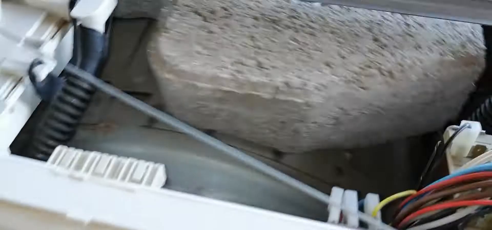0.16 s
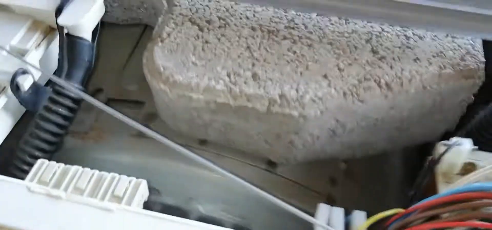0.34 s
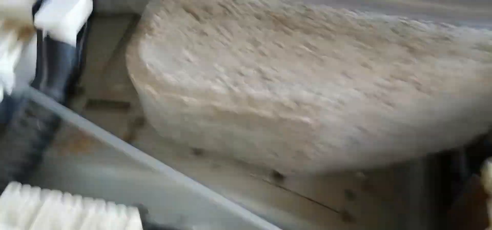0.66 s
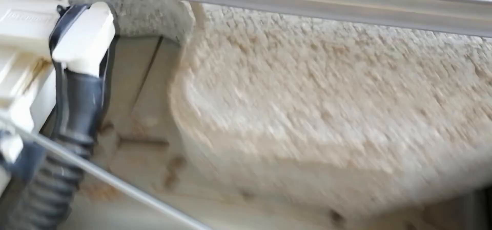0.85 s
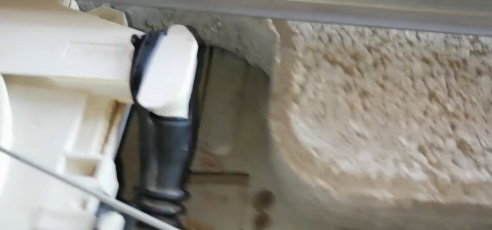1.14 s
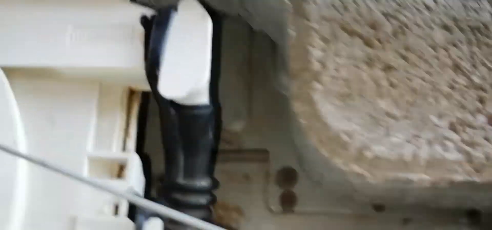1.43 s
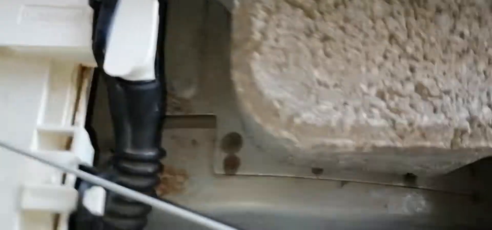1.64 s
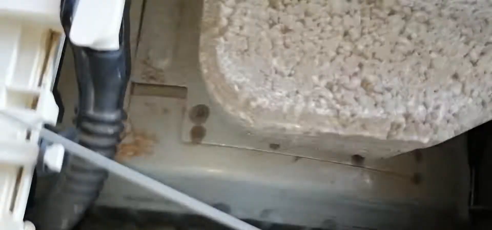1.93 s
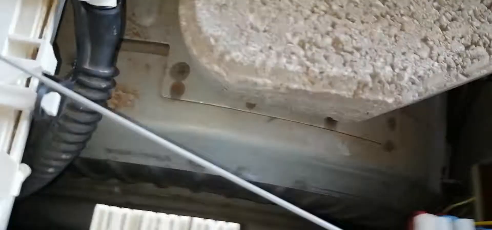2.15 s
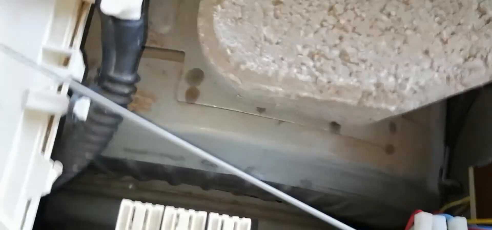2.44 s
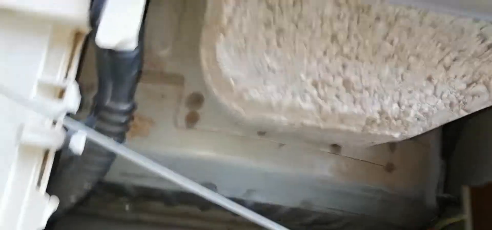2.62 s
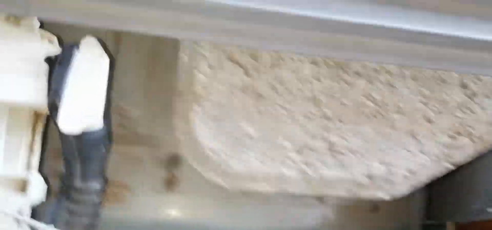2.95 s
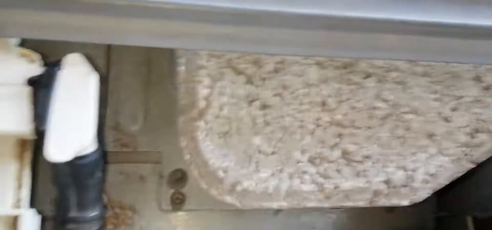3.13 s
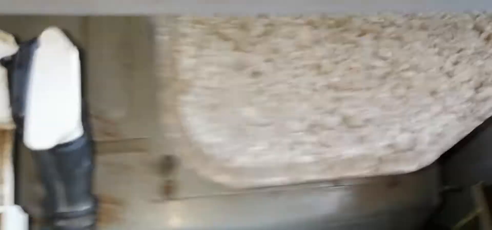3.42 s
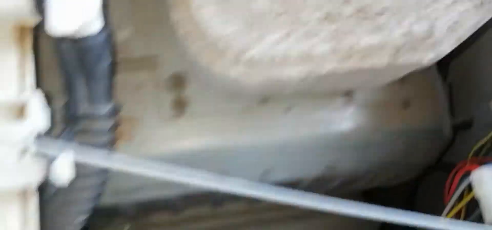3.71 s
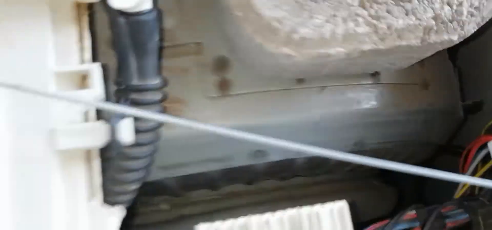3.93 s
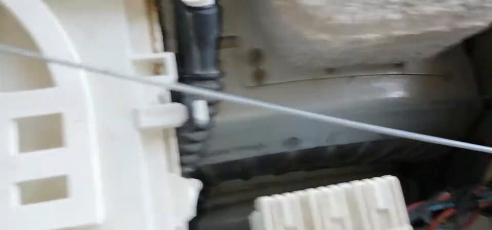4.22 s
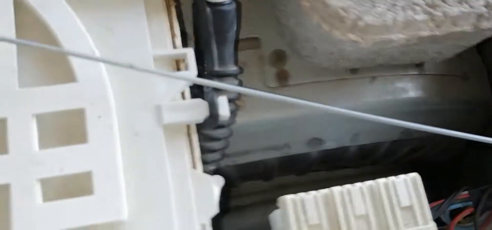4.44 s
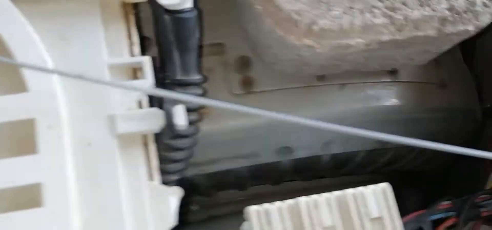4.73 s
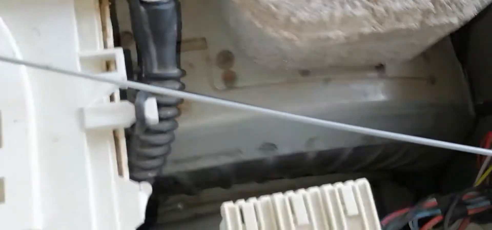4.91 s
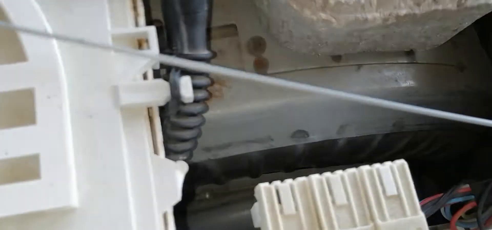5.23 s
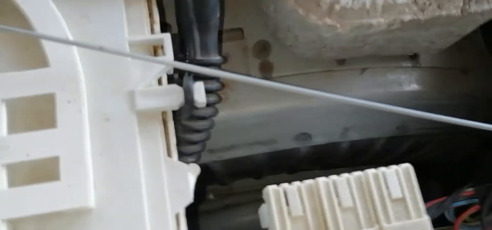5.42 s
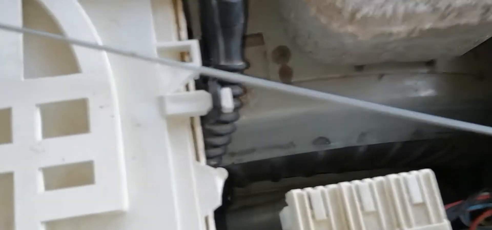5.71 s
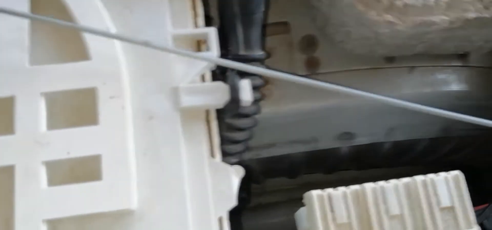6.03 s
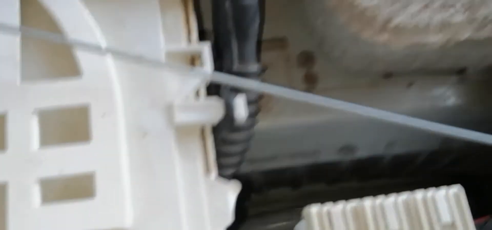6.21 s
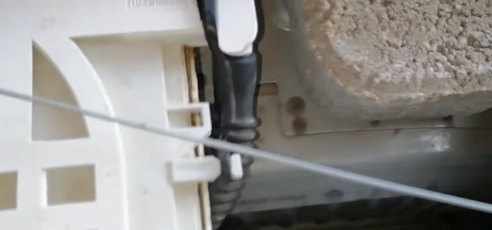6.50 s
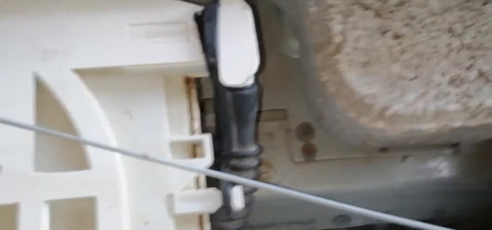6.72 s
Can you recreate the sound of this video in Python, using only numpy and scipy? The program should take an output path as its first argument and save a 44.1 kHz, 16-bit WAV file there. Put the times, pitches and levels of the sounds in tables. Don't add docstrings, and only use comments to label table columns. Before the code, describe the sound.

An unbalanced washing machine drum knocks fast and metallically inside its cabinet, slows to rumble and taps, rubs harshly on plastic, then knocks again.

```python
import sys
import numpy as np
from scipy import signal
from scipy.fft import rfft, irfft, next_fast_len
from scipy.io import wavfile
from scipy.ndimage import uniform_filter1d, map_coordinates

SR = 44100
rng = np.random.default_rng(int(sys.argv[2]) if len(sys.argv) > 2 else 0)


def magnitude_from_level(level_db):
    exponent = np.asarray(level_db, float) / 20
    return 10 ** exponent


def wav_out(sig):
    wavfile.write(sys.argv[1], SR, np.round(np.clip(np.atleast_2d(sig).T, -1, 1) * 32767).astype(np.int16))


N = 302526
TIME = np.arange(N) / SR
KNOCK = 8192
KNOCK_TIME = np.arange(KNOCK) / SR


def unit(x):
    return x / np.sqrt(np.mean(x ** 2) + 1e-20)


def along(points, hz):
    f, v = np.transpose(points)
    return np.interp(np.log(hz + 1), np.log(f + 1), v)


def filtered(x, response):
    m = next_fast_len(len(x) + 8192)
    return irfft(rfft(x, m) * response(np.fft.rfftfreq(m, 1 / SR)), m)[:len(x)]


def body(modes):
    def response(f):
        total = 0
        for k, (centre, width, db) in enumerate(modes):
            damping = 1j * f * width
            total = total + (-1) ** k * magnitude_from_level(db) * damping / (centre ** 2 - f ** 2 + damping)
        return total
    return response


def wobble(rate):
    return map_coordinates(rng.standard_normal(int(N * rate / SR) + 4), [np.arange(N) * rate / SR])


# f/Hz, time to fall 60 dB/s
CABINET = [(300, 0.26), (1000, 0.17), (3000, 0.091), (7000, 0.012)]


def tail():
    hz, t, z = signal.stft(rng.standard_normal(KNOCK), SR, nperseg=256)
    fading = magnitude_from_level(-60 * t / along(CABINET, hz)[:, None])
    answer = signal.istft(z * fading, SR, nperseg=256)[1][:KNOCK]
    return answer / np.linalg.norm(answer)


# t/s, stand 0-4
PATH = [
    (.9, 0),
    (1.45, 1),
    (2.1, 2),
    (2.5, 3),
    (5.85, 3),
    (6.05, 4),
]


def heard(stands, s):
    stand = np.interp(s, *np.transpose(PATH))
    return [np.interp(stand, np.arange(len(stands)), band) for band in np.transpose(stands)]


# f/Hz, width/Hz, level/dB
PART_EARLY = [(503, 23, -6), (646, 12, -1), (827, 19, -1.5), (957, 8.8, 3.5), (1101, 20.6, 5),
              (1233, 20, -9), (1440, 20, -12.5), (1600, 18, -5.5), (1955, 70, -4), (2520, 75, -6),
              (3013, 28, -2.5), (3140, 240, -12), (3494, 83, -10), (5010, 76, -21), (6000, 71, -17.5)]
PART_MIDDLE = [(672, 77, 0), (964, 36, -3), (1105, 25, -3.5), (1237, 16, -9), (1675, 77, -6), (2150, 40, 1),
               (2220, 70, -0.5), (2980, 200, -2), (3344, 150, -5.5), (3634, 40, -4.5), (4260, 250, -11),
               (4860, 310, -10.5), (5280, 17, -47), (6800, 110, -23)]
PART_FAR = [(637.6, 3.9, 8), (1109, 81, 0.5), (1487, 110, -8), (1772, 88, -10), (2140, 19, -10.5),
            (2354, 460, -4.5), (2350, 48, 6.5), (2850, 26, 3), (3610, 220, -0.5), (4010, 220, -2),
            (4510, 77, 2.5), (4800, 340, -5.5), (5170, 67, -37.5), (7000, 450, -14)]
PART_LATE = [(512, 120, -4), (665, 60, 0.5), (972, 53, 2), (1118, 43, -2.5), (1270, 117, -9.5),
             (1694, 33, -5.5), (1923, 25, -9.5), (2174, 14, -1.5), (2530, 15, -7.5), (3090, 100, -14),
             (3710, 76, -12), (4380, 90, -12.5), (4900, 350, -16), (6020, 150, -35), (6930, 240, -21)]
PLACES = [.8, 1.45, 2.1, 5.9]


def place(s, hz):
    step = np.interp(s, PLACES, np.arange(4))
    k = min(int(step), 2)
    parts = [PART_EARLY, PART_MIDDLE, PART_FAR, PART_LATE]
    near, then = [np.multiply(part, [1, 1.4, 1]) for part in parts[k:k + 2]]
    turn = np.pi / 2 * (step - k)
    return np.cos(turn) * body(near)(hz) + np.sin(turn) * body(then)(hz)


def rib(hz, rib_hz, db):
    return 1 + body([(rib_hz, 0.053 * rib_hz, db)])(hz)


def struck(ribs):
    def part(s, hz):
        low_hz, low_db, high_hz, high_db = heard(ribs, s)
        return place(s, hz) * rib(hz, low_hz, low_db) * rib(hz, high_hz, high_db)
    return part


# f/Hz, width/Hz, level/dB
BOOM = [(204.4, 13, -2.5), (234.7, 13, 5.5), (274.7, 11, 0.5), (329, 11, -12)]
# f/Hz, width/Hz, level/dB
THUD = [(266.4, 53, 0.009)]
THUD_RINGS_DB = -15.5
# f/Hz, level/dB
RATTLE = [(250, -18.5), (450, -11), (800, -10.5), (1500, -15.5), (3000, -17), (4000, -24), (5000, -21.5),
          (7500, -31)]


def knocks(rows, part, blow, rise, t60, fresh, fill_db, wet_db, gain_db, high_db, hold):
    out, t = np.zeros(N + KNOCK), KNOCK_TIME
    hz = np.fft.rfftfreq(2 * KNOCK, 1 / SR)
    push = np.exp(-t / 0.0012) * (1 - t / 0.00074)
    panel = body(THUD)(hz) + magnitude_from_level(THUD_RINGS_DB) * body(BOOM)(hz)
    thud = -irfft(rfft(push, 2 * KNOCK) * panel)[:KNOCK]
    echo = 1 + magnitude_from_level(wet_db) * rfft(tail(), 2 * KNOCK)
    contacts = rng.standard_normal(KNOCK)
    for s, db, mids_db, upper_db, treble_db, thud_db in rows:
        new = rng.standard_normal(KNOCK) * magnitude_from_level(1.5 * rng.standard_normal(KNOCK))
        contacts = np.sqrt(1 - fresh ** 2) * contacts + fresh * unit(new)
        lasts = t60 * magnitude_from_level(1.5 * rng.standard_normal())
        fading = magnitude_from_level(-60 * (t / lasts) ** hold) + magnitude_from_level(-24.5 - 60 * t / 0.36)
        chatter = contacts * (1 - np.exp(-t / rise)) ** .5 * fading
        chatter *= magnitude_from_level(1.6 * np.interp(t, np.arange(64) * .003, rng.standard_normal(64)))
        chatter[0] = blow
        colour = along([(1250, 0.0046), (1600, mids_db + 10 - high_db), (2100, mids_db + 6 + high_db),
                        (2500, upper_db + 6.5), (3300, upper_db + 6.5), (4000, treble_db + 9)], hz)
        uneven = 1.8 * np.interp(hz, np.linspace(0, 8000, 40), rng.standard_normal(40))
        clear = rfft(chatter, 2 * KNOCK) * part(s, hz)
        scrambled = chatter * rng.choice([-1, 1], KNOCK)
        diffuse = rfft(scrambled, 2 * KNOCK) * magnitude_from_level(along(RATTLE, hz) + fill_db)
        ring = irfft((clear + diffuse) * magnitude_from_level(colour + uneven) * echo)[:KNOCK]
        sound = ring / np.sqrt(np.mean(ring[:1024] ** 2))
        sound += magnitude_from_level(thud_db + 1) * thud / np.sqrt(np.mean(thud[:1024] ** 2))
        out[round(s * SR):][:KNOCK] += magnitude_from_level(db + gain_db) * sound
    return out[:N]


# first knock t/s, its peak level/dB, second knock level/dB, panel thud level/dB against the peak
TURNS = [(0.043, -23.5, -28.5, -5.5), (0.166, -23.5, -29, -4.5), (0.286, -23.5, -28, -14),
         (0.41, -23, -27, -13), (0.533, -22.5, -30.5, -13), (0.658, -22, -29.5, -11.5),
         (0.785, -23.5, -29, -5.5), (0.913, -22, -30.5, -11), (1.042, -23, -29, -8),
         (1.171, -23, -27.5, -2.5), (1.303, -23, -26, 1.5), (1.437, -21, -27.5, 1), (1.572, -22.5, -26, 2),
         (1.708, -25.5, -25, -2), (1.847, -29, -31, -7.5), (1.987, -28, -27.5, -9),
         (2.126, -28, -26.5, -25), (2.269, -28, -27.5, -10), (2.415, -41.5, -28.5, 0.5),
         (2.562, -47, -30.5, -13), (2.709, -54, -42.5, -15), (5.686, -48, -32.5, -2),
         (5.83, -31, -26.5, -1.5), (5.969, -27, -25, -1.5), (6.105, -24, -24, 1), (6.24, -21, -23.5, 4.5),
         (6.371, -21.5, -24.5, 5), (6.5, -21, -22, 3.5), (6.626, -23, -26.5, 1), (6.754, -23, -25, -2.5)]
# t/s, peak level/dB
GRAZES = [
    (2.403, -45),
    (2.548, -49.5),
    (2.689, -44.5),
    (2.84, -55),
    (2.899, -52.5),
]
# mids level/dB, upper mids level/dB, treble level/dB
FIRST_HEARD = [(-14, -11.5, -11.5), (-11, -16, -18.5), (-4.5, -20.5, -25), (-6, -2, -16), (-9.5, -8.5, -16)]
# low f/Hz, level/dB, high f/Hz, level/dB
FIRST_RIBS = [(3540, 7.5, 5900, -7), (3190, 4, 4120, 5.5), (3070, 5, 4100, -4), (3220, 7, 2000, -10),
              (3030, 2.5, 6050, 7.5)]


def first_knocks():
    rows = [(s, db, *heard(FIRST_HEARD, s), thud_db) for s, db, _, thud_db in TURNS]
    rows += [(s, db, *heard(FIRST_HEARD, s), -6) for s, db in GRAZES]
    return knocks(rows, struck(FIRST_RIBS), blow=5.5, rise=0.0008, t60=0.099, fresh=0.37, fill_db=1,
                  wet_db=-6, gain_db=-5, high_db=-1.5, hold=1.26)


# mids level/dB, upper mids level/dB, treble level/dB
SECOND_HEARD = [(-11, -7.5, -1.5), (-11, -18, -10.5), (-8.5, -10, -19), (-8.5, -3.5, -15.5),
                (-12.5, -7.5, -16.5)]
# low f/Hz, level/dB, high f/Hz, level/dB
SECOND_RIBS = [(2546, 7, 4700, -4), (1080, 1, 3100, -2.5), (1090, -3, 3300, -3), (1110, -10, 3000, -2),
               (1065, -5, 7000, -8)]
SECOND_LAG = .243


def second_knocks(speed):
    rows = [(s + SECOND_LAG / speed[round(s * SR)], db, *heard(SECOND_HEARD, s), thud_db)
            for s, _, db, thud_db in TURNS]
    return knocks(rows, struck(SECOND_RIBS), blow=.5, rise=0.0052, t60=0.051, fresh=0.44, fill_db=5,
                  wet_db=-3.5, gain_db=-4, high_db=6, hold=0.91)


THIRD_DB = [-6.5, -24.5, -16, -24, -23]
THIRD_LAG = .55


def third_bounces(speed):
    rows = [(s + THIRD_LAG / speed[round(s * SR)], db + heard(np.c_[THIRD_DB], s)[0],
             *heard(FIRST_HEARD, s), -4) for s, _, db, _ in TURNS[:-1]]
    return knocks(rows, place, blow=1.5, rise=0.0032, t60=0.028, fresh=0.71, fill_db=4.5,
                  wet_db=-0.5, gain_db=-8, high_db=4.5, hold=0.94)


# peak t/s, rise t/s, fall t/s, level/dB, squeak level/dB
RUBS = [
    (4.47, 0.057, 0.024, -23.5, 9),
    (4.641, 0.061, 0.042, -24, 10),
    (4.745, 0.028, 0.0047, -20, 0),
    (4.814, 0.044, 0.066, -19, 4),
    (4.906, 0.046, 0.029, -17, -3.5),
    (4.991, 0.052, 0.036, -18, 4.5),
    (5.088, .055, 0.016, -16.5, 0),
    (5.175, 0.064, 0.048, -20, 4),
    (5.264, 0.044, 0.095, -18, -2.5),
]
RUB_LEANS = [-0.5, -3, -4.5, 2.5, -3.5, -2.5, -4, 1, 1.5]
# f/Hz, width/Hz, level/dB
HOUSING = [(339, 14, -11), (480, 22, 11.5), (635, 33, 3), (793, 51, 8), (1060, 100, -7), (1266, 54, 0.5),
           (1636, 64, -4), (1840, 80, -6), (2350, 130, -17), (2640, 35, -15), (3280, 60, -18),
           (3460, 80, -18), (4870, 250, -28.5), (7700, 270, -53.5)]
# f/Hz, level/dB
GRIT = [(150, -21), (300, -0.5), (420, 0.5), (600, -8), (1050, -7.5), (1500, -17), (2600, -12.5),
        (3500, -28), (4600, -41), (7500, -58)]
TILT_DB, TILT_PER_SQUEAK = -3.5, 0.19
LOW_RIB_HZ, HIGH_RIB_HZ = 500, 760


def rubbing():
    out, t = np.zeros(N + KNOCK), KNOCK_TIME
    for (s, rise, fall, db, squeak_db), lean_db in zip(RUBS, RUB_LEANS):
        tilt_db = TILT_DB + TILT_PER_SQUEAK * squeak_db
        knots = [0, 0.059 * rise, rise, rise + 0.71 * fall, rise + fall]
        stroke = magnitude_from_level(np.interp(t, knots, [-22, -6, -1, -16.5, -29.5])) * (t < rise + fall)
        grains = (rng.random(KNOCK) < .15) * rng.standard_normal(KNOCK)
        slips = stroke * grains * magnitude_from_level(2 * rng.standard_normal(KNOCK))

        def plastic(f):
            tilt = tilt_db * np.log2(f / 700 + 1)
            squeak = along([(1050, 0), (1300, squeak_db), (1750, squeak_db), (2100, 0.0082)], f)
            ribs = along([(330, 0), (LOW_RIB_HZ, lean_db), (HIGH_RIB_HZ, -lean_db), (1000, 0)], f)
            return (body(HOUSING)(f) + magnitude_from_level(along(GRIT, f))) * magnitude_from_level(tilt + squeak + ribs)

        def treble(f):
            return f ** 2 / (f ** 2 + 1400 ** 2)

        ring = filtered(slips, lambda f: plastic(f) * (1 - treble(f)))
        ring = ring + filtered(slips * stroke ** 0.96, lambda f: plastic(f) * treble(f))
        ring = ring + magnitude_from_level(-5.5) * signal.fftconvolve(ring, tail())[:KNOCK]
        level = magnitude_from_level(db) * np.linalg.norm(stroke) / np.linalg.norm(ring)
        out[round((s - rise) * SR):][:KNOCK] += level * ring
    return out[:N]


# t/s, peak level/dB
CATCHES = [(4.399, -20), (4.429, -13.5), (4.574, -18), (4.62, -29), (4.726, -23), (4.807, -20),
           (4.872, -16), (4.885, -22), (4.905, -15), (4.919, -16), (4.954, -20), (5.048, -21), (5.073, -13),
           (5.087, -16.5), (5.132, -18), (5.186, -15), (5.253, -11.5)]


def catches():
    out = np.zeros(N)
    s, db = np.transpose(CATCHES)
    out[np.round(s * SR).astype(int)] = magnitude_from_level(db - 5.5) * rng.choice([-1, 1], len(s))
    damped = np.multiply(HOUSING, [1, 2.5, 1])

    def plastic(f):
        return body(damped)(f) * magnitude_from_level(-7 * np.log2(f / 700 + 1))

    one_slip = filtered(np.r_[1., np.zeros(KNOCK)], plastic)
    return filtered(out, plastic) / abs(one_slip).max()


# t/s, peak level/dB, sharpness/dB, thud level/dB against the peak, struck rib f/Hz
TAPS = [(3.397, -30, -0.5, -15, 1467), (3.411, -44, -7, -21, 1730), (3.52, -49, 1, -14, 2740),
        (3.556, -32.5, -2, -26, 1280), (3.716, -30, 2, -17, 1654), (3.727, -42.5, 3, -28, 1830),
        (3.88, -30.5, 0, -23, 1720), (3.893, -38, -5, -25, 1060), (3.94, -42.5, 19, -16, 2980),
        (3.947, -43, 11, -12, 1630), (4.386, -28, 0.5, -10, 860), (4.525, -46, 18, 5, 1590),
        (4.559, -31.5, -9, -14, 1840), (4.713, -30.5, 0, -37, 1180), (4.98, -34, 6, -28.5, 2620),
        (5.355, -34, 3.5, -21, 1600), (5.366, -34, -2, -17, 1260), (5.444, -27.5, -0.5, -29, 1520),
        (5.47, -30.5, -14, -11, 620), (5.773, -41, -12, -1, 980)]
# f/Hz, width/Hz, level/dB
HOUSING_TAP = [(620, 160, 2.5), (770, 61, 11), (1030, 47, -0.5), (1512, 190, -9.5), (1787, 18, -5),
               (2320, 45, -11.5), (2550, 78, -18), (3300, 92, -24), (3480, 110, -33.5), (4600, 120, -25.5),
               (5100, 170, -37.5), (6840, 260, -40)]
# mids, upper mids, treble level/dB; then what each gains per dB of sharpness
TAP_HEARD = (-5, -10, -12)
TAP_SHARPENS = (.5, 1, 1)


def housing(s, hz):
    rib_hz = np.interp(s, np.array(TAPS)[:, 0], np.array(TAPS)[:, 4])
    return body(HOUSING_TAP)(hz) + body([(rib_hz, 92, 1.5)])(hz)


def taps():
    rows = [(s, db, *np.add(TAP_HEARD, np.multiply(TAP_SHARPENS, sharp_db)), thud_db)
            for s, db, sharp_db, thud_db, _ in TAPS]
    return knocks(rows, housing, blow=7, rise=0.0006, t60=0.05, fresh=0.88, fill_db=-3,
                  wet_db=-6, gain_db=-3, high_db=2.5, hold=1.2)


QUIET_TURNS = [3.45, 3.606, 3.766, 3.93, 4.096, 4.264, 4.435, 4.608, 4.765]


def angle():
    s = np.sort(np.r_[np.array(TURNS)[:, 0], QUIET_TURNS])
    turns = np.cumsum(np.round(np.diff(s, prepend=s[0]) / .146))
    s = np.r_[s[0] - .366, s, s[-1] + .378]
    turns = np.r_[-3, turns, turns[-1] + 3]
    rough = np.interp(np.arange(-SR // 4, N + SR // 4) / SR, s, turns)
    return uniform_filter1d(rough, size=SR // 4)[SR // 4:][:N]


def turning(around, steps, fresh):
    pattern = rng.standard_normal(steps)[(around % 1 * steps).astype(int)]
    ticks = pattern * (np.diff(np.floor(around * steps), prepend=0) != 0)
    return unit(ticks) + fresh * rng.standard_normal(N)


def blows(around, pattern, scatter_db):
    out = np.zeros(N)
    for turn, db in pattern:
        at = np.flatnonzero(np.diff(np.floor(around - turn)) > 0)
        out[at] = magnitude_from_level(db + scatter_db * rng.standard_normal(len(at)))
    return unit(out)


# turn 0-1, level/dB
BUMPS = [(0.126, 0.5), (0.389, 6), (0.603, -1), (0.811, -4)]
# turn 0-1, level/dB
SLAPS = [(.012, -3), (.15, -4), (.26, -7), (.575, 0), (.82, -7)]
# f/Hz, width/Hz, level/dB
SLAPPED = [(223, 17.5, 0)]
# t/s, level/dB
FACING = [(0, -1.5), (.9, -3.5), (1.8, -2), (2.4, -1.5), (2.9, -2.5), (3.3, -19.5), (4.4, -6), (5.2, -6),
          (5.7, -12.5), (6.101, 0.5), (6.86, -4)]


def panels(around):
    push = 0.33 * blows(around, BUMPS, scatter_db=4.5) + 1.1 * turning(around, steps=300, fresh=0.93)
    slaps = blows(around, SLAPS, scatter_db=2)
    facing = magnitude_from_level(np.interp(TIME, *np.transpose(FACING)))
    big = filtered(push, body(BOOM[1:2]))
    whole = filtered(push, body(BOOM))
    slapped = unit(filtered(-slaps, lambda f: body(SLAPPED)(f) / (1 + 1j * f / 450) ** 3))
    return magnitude_from_level(-2) * (whole + (1 - facing) * big) / np.std(whole) + magnitude_from_level(-1.5) * facing * slapped


# turn 0-1, level/dB
LURCHES = [(0.204, -9.5), (0.718, -8)]
# f/Hz, width/Hz, level/dB
SWAY = [(95.4, 7, -5), (115.4, 11, 1), (141, 25, -2)]


def swaying(around):
    push = blows(around, LURCHES, scatter_db=1.5) + 1.8 * turning(around, steps=300, fresh=0.23)
    return unit(filtered(push, body(SWAY)))


# f/Hz, width/Hz, level/dB
FEET = [(28, 89, -5.5), (52.7, 13, 5.5), (78, 36, -9.5)]
ROCK_DB, ROCK_HZ, ROCK_WIDTH_HZ = -46, 6.81, 1


def feet(around, speed):
    rocking = magnitude_from_level(ROCK_DB) / np.sqrt(1 + (2 * (speed - ROCK_HZ) / ROCK_WIDTH_HZ) ** 2)
    return rocking * unit(filtered(turning(around, steps=200, fresh=0.28), body(FEET)))


# f/Hz, level/dB
WHIRR = [(180, -18), (300, 3), (359, 2), (420, 1.5), (507, 3), (580, -2.5), (973, -5.5), (1110, -18.5),
         (1800, -46), (2340, -56), (3960, -120)]
WHIRR_DB, WHIRR_PER_SHAKE, WHIRR_PER_LEAN, WHIRR_PER_SPEED = -41, 0.26, 0.48, -1.1
LOAD_DB, LOAD_AT = -1, 0.42


def whirring(around, shake, lean, faster):
    level_db = WHIRR_DB + WHIRR_PER_SHAKE * shake + WHIRR_PER_LEAN * lean + WHIRR_PER_SPEED * faster
    knocking = np.clip(np.interp(TIME, *np.transpose(TURNS)[:2]) / 20 + 2.2, 0, 1)
    level_db = level_db + LOAD_DB * knocking * np.cos(2 * np.pi * (around - LOAD_AT))
    rough = magnitude_from_level(2.5 * wobble(40)) * turning(around, steps=900, fresh=2.3)
    return magnitude_from_level(level_db) * unit(filtered(rough, lambda hz: magnitude_from_level(along(WHIRR, hz))))


def humming(lean):
    phase = 2 * np.pi * 121.8 * TIME + 0.21 * wobble(3.8)
    return magnitude_from_level(-47.5 + 0.31 * lean + 1.3 * wobble(3.5)) * np.sin(phase)


# f/Hz, level/dB
HISS = [(710, -31), (1200, 0), (1930, -12), (2280, -7), (3120, -11.5), (3740, -22.5), (5110, -13),
        (6170, -18.5), (6830, -15.5), (7330, -13), (7800, -42), (10100, -67.5), (17200, -120)]
HISS_DB, HISS_PER_SPEED, HISS_PER_SHAKE = -52.5, 1.8, -0.067


def hissing(shake, faster):
    level_db = HISS_DB + HISS_PER_SPEED * faster + HISS_PER_SHAKE * shake
    rough = magnitude_from_level(3.3 * np.tanh(wobble(30)) + 1.5 * wobble(120)) * rng.standard_normal(N)
    return magnitude_from_level(level_db) * unit(filtered(rough, lambda hz: magnitude_from_level(along(HISS, hz))))


# t/s, shake level/dB, lean level/dB
DRUM = [(0.0, -35, -45), (0.4, -37.5, -54.5), (0.86, -33.5, -47.5), (1.139, -34, -42.5), (1.5, -31, -44.5),
        (1.901, -37, -45), (2.391, -35, -46), (2.92, -38.5, -41), (3.199, -37, -44), (3.603, -38.5, -43),
        (4.091, -39.5, -45.5), (4.699, -42, -47.5), (4.85, -36, -38.5), (5.201, -37, -56),
        (5.562, -34, -35.5), (6.06, -29, -46), (6.462, -27.5, -37.5), (6.86, -30.5, -51.5)]


def drum(around, speed):
    s, shake_db, lean_db = np.transpose(DRUM)
    boom_db, sway_db = np.interp(TIME, s, shake_db), np.interp(TIME, s, lean_db)
    shake, lean, faster = boom_db - boom_db.mean(), sway_db - sway_db.mean(), speed - speed.mean()
    rumble = magnitude_from_level(boom_db + 0.5) * panels(around) + magnitude_from_level(sway_db + 3.5) * swaying(around)
    machine = whirring(around, shake, lean, faster) + humming(lean) + hissing(shake, faster)
    return rumble + feet(around, speed) + machine


def scene():
    around = angle()
    speed = np.gradient(around) * SR
    knocking = first_knocks() + second_knocks(speed) + third_bounces(speed)
    plastic = rubbing() + catches() + taps()
    return (knocking + plastic + drum(around, speed))[None]


def low_pass(x):
    return signal.sosfilt(signal.butter(12, 8200, fs=SR, output="sos"), x)


# f/Hz, level/dB
EDGE = [(7000, -0.5), (7500, -8), (7900, -37.5), (8200, -44)]


def record(dry):
    narrow = filtered(dry[0], lambda hz: magnitude_from_level(along(EDGE, hz)) * (hz < 8250))
    return low_pass(narrow[None])


dry = scene()
out = record(dry)
wav_out(out)
```